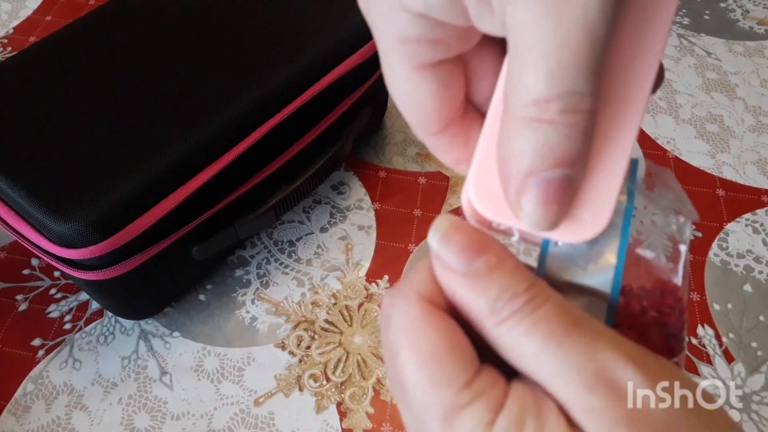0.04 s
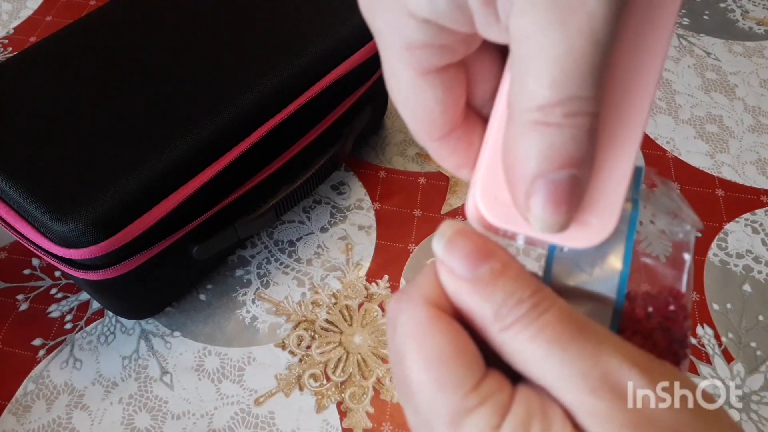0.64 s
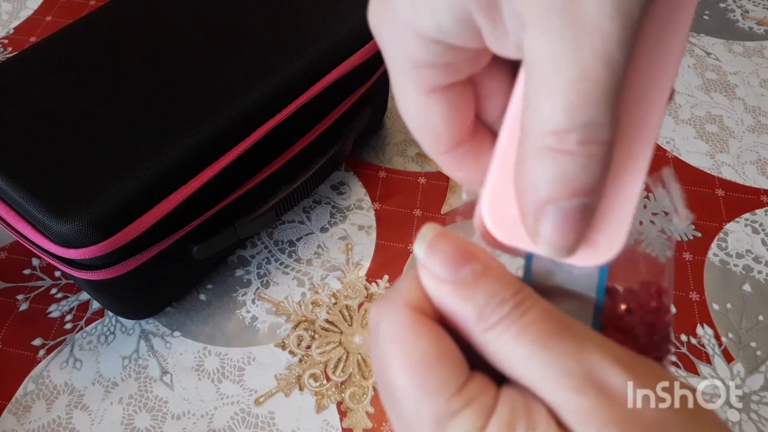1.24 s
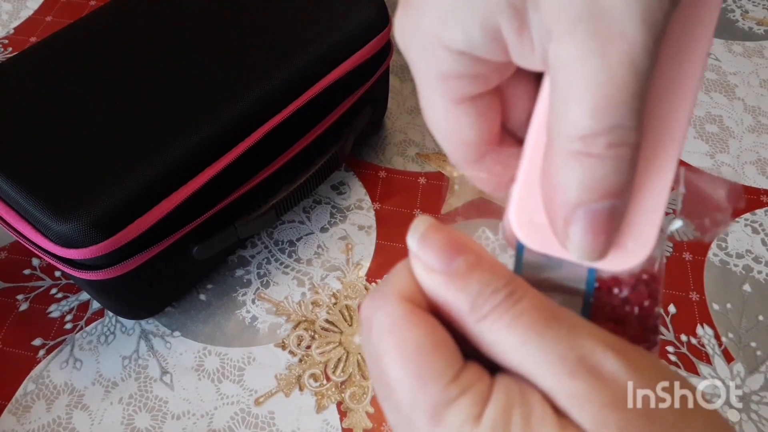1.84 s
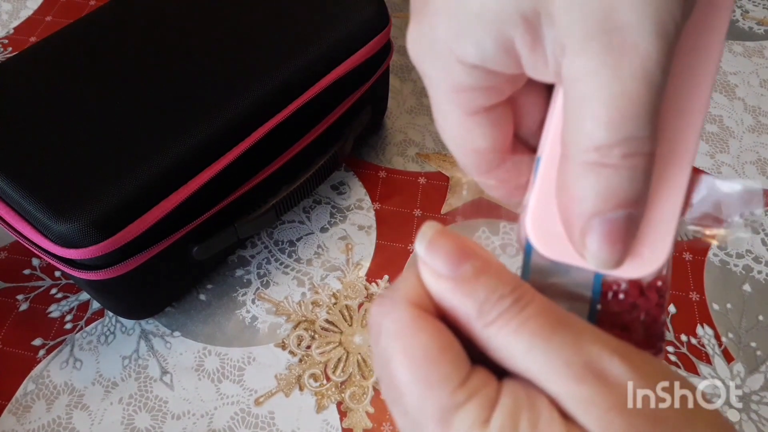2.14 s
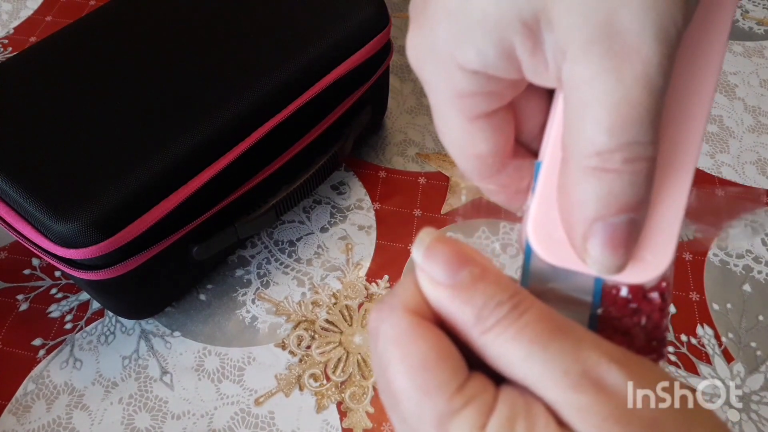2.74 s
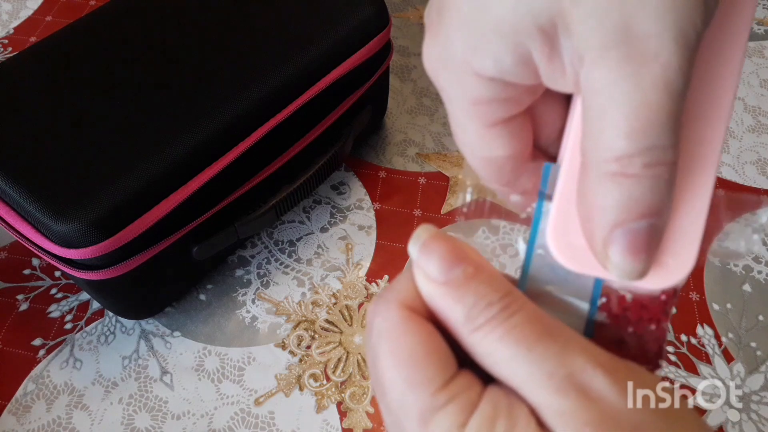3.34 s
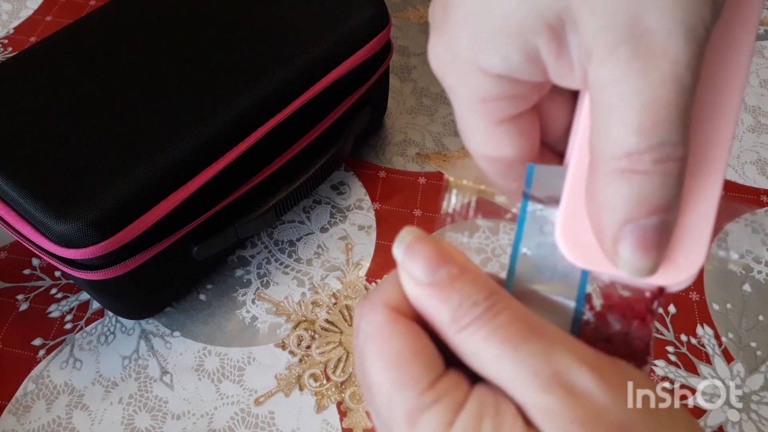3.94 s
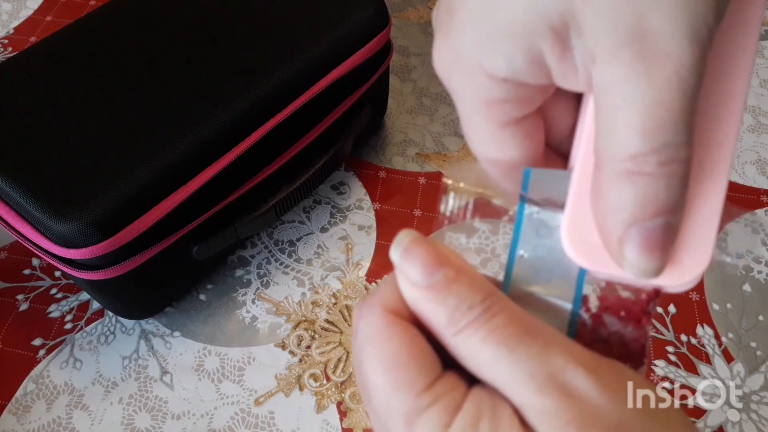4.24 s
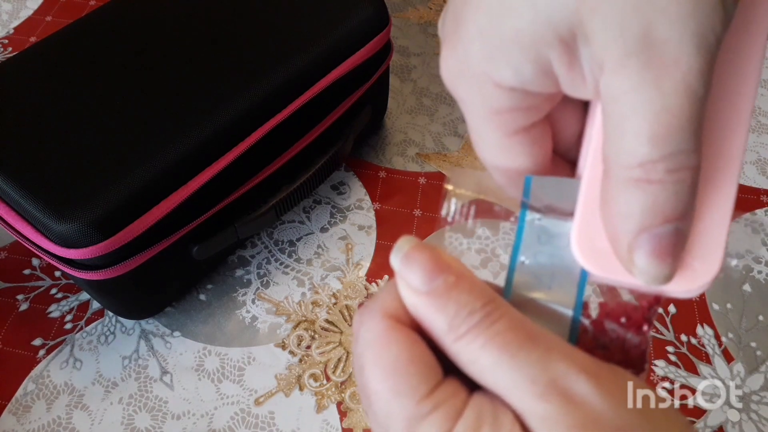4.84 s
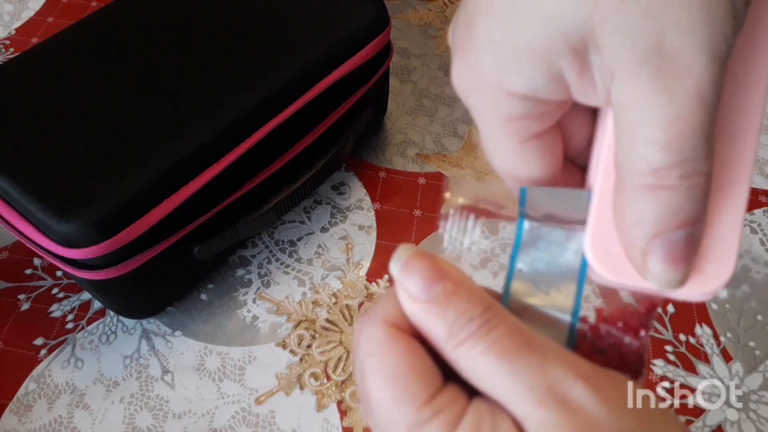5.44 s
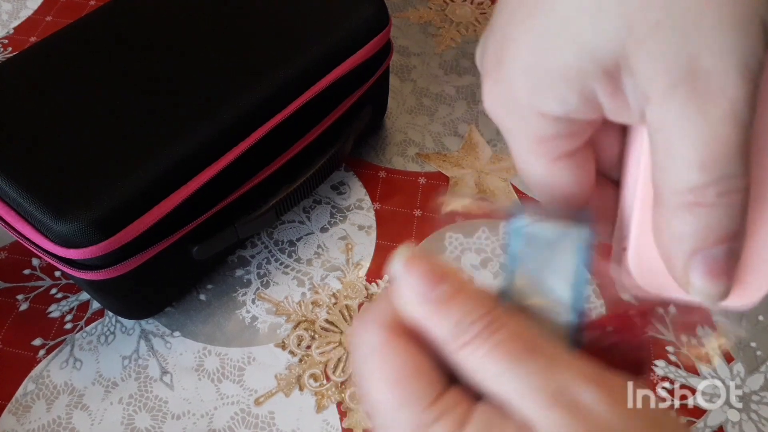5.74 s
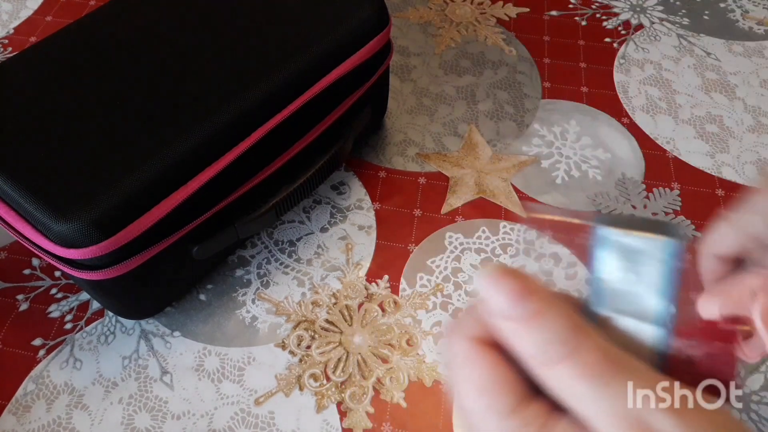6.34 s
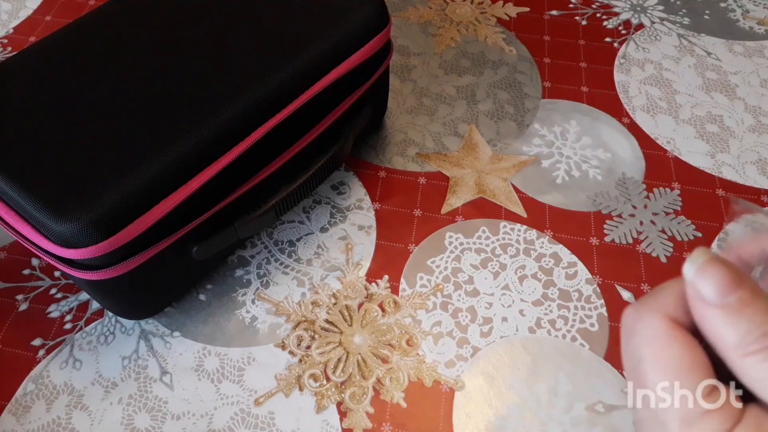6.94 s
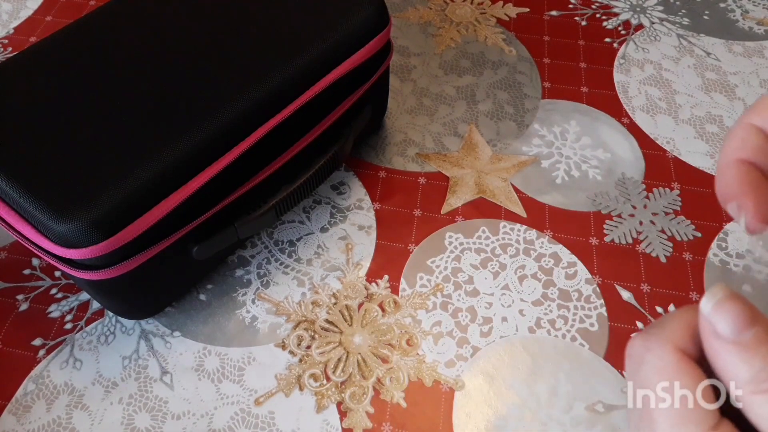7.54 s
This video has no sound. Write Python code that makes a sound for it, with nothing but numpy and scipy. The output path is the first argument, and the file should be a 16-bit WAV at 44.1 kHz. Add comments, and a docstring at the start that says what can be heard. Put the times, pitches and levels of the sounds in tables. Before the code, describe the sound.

Close by, a thin plastic bag crackles with sharp little snaps as a handheld heat sealer is drawn along its edge. The film rubs, sticks and slips through the jaws in quick runs of ticks. After a quieter stretch, the bag is pulled free with a loud crinkle, the hollow sealer knocks down on a table, and the bag crinkles once more. A small room echoes slightly over a faint hum.

```python
"""Sealing a plastic bag

A small handheld heat sealer is drawn along the edge of a thin plastic bag, close by. Creases snap,
the film sticks and slips between the jaws, and the bag is pulled free with a loud crinkle.
The hollow sealer then knocks down on the table. A small room echoes, over a faint hum."""
import sys
import numpy as np
from scipy import signal
from scipy.fft import rfft, irfft, next_fast_len
from scipy.io import wavfile

SR = 44100
rng = np.random.default_rng(int(sys.argv[2]) if len(sys.argv) > 2 else 0)


def output_pcm(signal):
    """Save a mono or channel-first signal as 16-bit PCM at the path in sys.argv[1].

    Samples are clipped to [-1, 1] before scaling.
    """
    pcm = np.clip(np.atleast_2d(signal).T, -1, 1) * 32767
    wavfile.write(sys.argv[1], SR, np.round(pcm).astype(np.int16))


N = 334719
TIME = np.arange(N) / SR
CLICK_SAMPLES = 2048
FREQS = np.fft.rfftfreq(CLICK_SAMPLES, 1 / SR)  # the frequencies a click is built from


def amp(db):
    """Turns decibels into a gain to multiply by."""
    return 10 ** (np.asarray(db) / 20)


def unit(x):
    """Scales a signal to an average (rms) level of one."""
    return x / np.sqrt(np.mean(x ** 2) + 1e-20)


def look_up(table, hz=FREQS):
    """Reads between the rows of a table, on a logarithmic frequency scale."""
    row_hz, value = np.transpose(table)
    return np.interp(np.log(hz + 1), np.log(row_hz + 1), value)


def noise(tone):
    """Steady noise of level one, shaped by a tone table."""
    size = next_fast_len(N)
    gain = amp(look_up(tone, np.fft.rfftfreq(size, 1 / SR)))
    return unit(irfft(rfft(rng.standard_normal(N), size) * gain, size)[:N])


def add(mix, start_s, sound):
    """Mixes a sound in at the given time."""
    part = mix[max(round(start_s * SR), 0):][:len(sound)]
    part += sound[:len(part)]


def resonance(hz, width_hz):
    """A peak of gain around one pitch: the narrower it is, the longer it rings."""
    return 1 / (1 + ((FREQS ** 2 - hz ** 2) / ((FREQS + 1) * width_hz)) ** 2)


def click(gain):
    """The sharpest click that starts at time zero and has this gain at each frequency."""
    log_gain = np.log(np.maximum(gain, 1e-5))
    mirrored = np.concatenate([log_gain, log_gain[-2:0:-1]])
    return np.fft.ifft(np.exp(np.conj(signal.hilbert(mirrored)))).real


def smear(pulse, lag_at_4khz_s=0.0003076):
    """High bending waves outrun low ones, so a click spreads out a little."""
    cycles = 2 * lag_at_4khz_s * np.sqrt(4000 * np.fft.rfftfreq(len(pulse), 1 / SR))
    return irfft(rfft(pulse) * np.exp(-2j * np.pi * cycles))


def drift(per_s):
    """A slow random curve that wanders around zero."""
    times = np.arange(0, TIME[-1] + 1, 1 / per_s)
    return np.interp(TIME, times, rng.standard_normal(len(times))) * np.sqrt(3 / 2)


# Tone of the quiet room (frequency [Hz], level [dB])
ROOM_NOISE_TONE = [(15, -65), (25, -30.5), (97, -11), (120, -15), (145, -6.5), (195, -14.5), (242, -6),
                   (309, -13), (335, -18.5), (384, -17), (416, -19), (451, -11.5), (531, -27),
                   (2840, -34.5), (16000, -38.5)]
# Notes in the electrical hum (frequency [Hz], level [dB])
HUM_NOTES = [(100, -89.5), (150.2, -79), (250.3, -76.5), (300, -81.5), (450.5, -79)]
def background(noise_db=-71):
    """Low room noise and a mains hum that wavers slightly."""
    out = amp(noise_db) * noise(ROOM_NOISE_TONE)
    for hz, db in HUM_NOTES:
        waver = 1 + 0.12 * drift(4)
        out += amp(db) * unit(waver * np.sin(2 * np.pi * hz * TIME + 0.15 * drift(3)))
    return out


def effort(moves):
    """Level in dB of hand movements over time: each swells to a peak and dies away."""
    power = np.zeros(N)
    for peak_s, db, rise_s, fall_s in moves:
        away = np.maximum((peak_s - TIME) / rise_s, (TIME - peak_s) / fall_s)
        power += amp(db - 20 * np.minimum(away, 10)) ** 2
    return 10 * np.log10(power)


def tiny_clicks(level_db, gain, per_s, spread_db, width_hz=3500, flat_gain=0.34, pitches=5):
    """Countless tiny clicks of random size blend together and follow a level curve."""
    out = np.zeros(N)
    for hz in np.linspace(1500, 8000, pitches):
        sizes = amp(spread_db * np.minimum(rng.exponential(1, N), 4))
        chance = rng.uniform(-1, 1, N)  # a crease may flip either way
        spikes = sizes * np.sign(chance) * (abs(chance) < per_s / pitches / SR)
        tick = smear(click(gain * (resonance(hz, width_hz) + flat_gain)))
        out += signal.oaconvolve(spikes, tick)[:N]
    return amp(level_db) * unit(out)


# Hands bending the loose film (peak time [s], level [dB], 20 dB rise [s], 20 dB fall [s])
BENDS = [(.01, -65, 0.1, 0.16), (.35, -72.5, 0.028, 0.067), (1.0, -64, 0.075, 0.14),
         (1.22, -52.5, 0.12, 0.11), (3.575, -70, 0.14, 0.09), (3.82, -73.5, 0.67, 0.9),
         (4.08, -79, 0.35, 0.18), (5.0, -68, 0.073, 0.5), (5.2, -66, .05, .12), (5.64, -39, 0.048, .05),
         (5.755, -44, 0.13, 0.2), (5.95, -52, 0.2, 0.16), (6.28, -58, .14, 0.16), (6.45, -65.5, 0.11, 0.33),
         (6.625, -55.5, 0.032, 0.083), (7.43, -60.5, 0.2, 0.28), (7.575, -43.5, 0.046, 0.051)]
# Tone of the soft rustle (frequency [Hz], level [dB])
RUSTLE_TONE = [(200, -33.5), (700, -18), (1600, -5.5), (2200, 2), (3800, 1), (6000, -0.5), (7500, -6.5),
               (9500, -22.5), (12000, -20.5), (16000, -23.5)]
# Tone of the brittle crack that starts a snap (frequency [Hz], level [dB])
CRACK_TONE = [(20, -43.5), (120, -9), (400, 2.5), (620, -5), (900, 1.5), (6500, -3.5), (9500, -7.5),
              (12000, -5.5), (16000, -7.5)]
def crinkle(hard_bend_db=-48, steepness=2.4, brittle_db=-56):
    """The loose film rustles softly; hard bending adds bright, brittle cracks."""
    bending_db = effort(BENDS)
    rustle = tiny_clicks(bending_db, amp(look_up(RUSTLE_TONE)), per_s=900, spread_db=2.5)
    cracking_db = brittle_db + steepness * (bending_db - hard_bend_db)
    brittle = amp(look_up(CRACK_TONE))
    cracks = tiny_clicks(cracking_db, brittle, per_s=1200, spread_db=10.5, flat_gain=4.9, pitches=1)
    return rustle + cracks


# Tone the film gives to every snap (frequency [Hz], level [dB])
FILM_TONE = [(100, -13), (300, -4.5), (800, -2.5), (6500, 0.5), (7800, -2.5), (9500, -21.5), (12000, -14.5),
             (16000, -15)]
def small_snaps(effort_db, per_s=55, level_db=-25, usual_effort_db=-60, ring_hz=4600, sheet_hz=1650):
    """Small creases give way at random moments, louder the harder the film is worked."""
    out = np.zeros(N)
    film, brittle = amp(look_up(FILM_TONE)), amp(look_up(CRACK_TONE))
    for k, (late, size, pitch, body) in enumerate(rng.standard_normal((800, 4))):
        start_s = (k + late / 2) / per_s
        if 0 < start_s < TIME[-1]:
            ring = resonance(ring_hz * 2 ** (0.34 * pitch), width_hz=2200)
            sheet = amp(-5 + 5 * body) * resonance(sheet_hz, sheet_hz / 2)
            gain = np.hypot(film * np.hypot(ring, sheet), brittle * amp(-24))
            db = level_db + 0.96 * (effort_db[int(start_s * SR)] - usual_effort_db) + 3 * size
            add(out, start_s, amp(db) * smear(click(gain)))
    return out


def flutter(pulse, strength=0.53, decay_s=0.0021, delay_s=0.0005):
    """Ripples cross the sheet and come back for a few milliseconds after a snap."""
    t = TIME[:512]
    waves = rng.standard_normal(len(t)) * np.exp(-t / decay_s) * (t > delay_s)
    waves *= strength / np.linalg.norm(waves)
    waves[0] = 1  # the snap itself
    return signal.fftconvolve(pulse, waves / np.sqrt(1 + strength ** 2))


# The sheet rings lower as film comes free of the jaws, higher when held tight (time [s], pitch [Hz])
SHEET_PITCH = [(1, 1730), (3.3, 1650), (3.8, 1124), (5.15, 1036), (5.6, 1426), (5.71, 910), (5.8, 1882),
               (7.35, 2000), (7.56, 1040)]
# Loud creases snapping (time [s], level [dB], ring pitch [Hz], ring width [Hz],
# sheet compared with ring [dB], base crack compared with ring [dB], relative room echo [dB])
CREASE_SNAPS = [(0.055, -19, 3860, 2400, -30, -29, -9.5), (.254, -38, 3480, 4000, -5, -28, -7),
                (0.9885, -23.5, 4140, 1186, 6.5, -24, 4), (1.0454, -1.5, 3940, 4560, -4.5, -20, -13.5),
                (1.097, -7, 4100, 3500, 4, -22, -13.5), (1.1697, 1, 3780, 2090, -13, -19, -6),
                (1.1724, -1.5, 5360, 6900, -2, -26, -11), (1.2069, 3, 3450, 4100, -3, -49, -17.5),
                (1.2151, -2.5, 4170, 3640, -2, -11, -17), (1.2893, 5.5, 4720, 3480, -17, -48, -15.5),
                (1.3302, -12.5, 4220, 2200, -7, -24, -16), (1.4134, -3.5, 3930, 3000, -23, -48, -11.5),
                (1.4415, -7.5, 4230, 1500, -8.5, -35, -17), (1.5292, 2.5, 3800, 2550, -8.5, -46, -14.5),
                (1.5938, -29.5, 3670, 1200, 18.5, -21, -11), (1.6119, 1, 4370, 3300, -5, -25, -8.5),
                (1.7558, -1.5, 3980, 4900, -1.5, -30, -10), (1.797, -15, 5530, 7000, -4, -21, -5),
                (1.8008, -7, 5830, 7000, -3.5, -25, -11), (1.8223, -5, 4830, 3900, -4, -14, -23),
                (1.8364, -3, 5800, 6200, -10.5, -27, -13), (1.9002, -19.5, 4330, 2800, -6, -33, -25),
                (2.008, -19.5, 4730, 2900, -19, -19.5, -8), (2.0327, -6, 5470, 5000, -35, -35, -9),
                (2.2084, -18.5, 7080, 7000, -15, -22, -5), (2.2195, -7.5, 5540, 7050, -16, -38, -10),
                (2.2251, -5.5, 5200, 2400, -7, -40, -14), (2.2911, -13, 4660, 3400, -10, -23, -14),
                (2.6214, 0.5, 5300, 4850, -10.5, -22.5, -12), (2.883, -6, 4990, 5610, -15.5, -19, -13),
                (2.9638, -12, 5010, 3590, -11, -30, -10.5), (3.0124, -4.5, 4110, 1384, -21, -35.5, -15),
                (3.0178, -16, 4960, 2600, -15, -20.5, -9), (3.03, -13, 5190, 2200, -7, -35.5, -13.5),
                (3.1312, 10, 4030, 1380, -4.5, -48.5, -16.5), (3.2232, -14.5, 2950, 3000, 2.5, -39, -8),
                (3.2626, 12.5, 4410, 1900, -9.5, -30, -16), (3.541, -28, 5000, 6240, 5.5, -37.5, -4),
                (3.577, -19.5, 7000, 6000, -12, -15, -11), (3.785, -7.5, 4450, 7050, 1, -31, -9.5),
                (3.876, 4.5, 3490, 2640, -9, -24, -12.5), (4.1102, -18, 2440, 1210, -4, -31, -6.5),
                (4.9887, -1.5, 3520, 2070, -2.5, -48, -15), (5.0326, -11, 3370, 2400, 1.5, -44.5, -7),
                (5.086, -6, 3820, 3800, -1.5, -29, -13), (5.095, -17, 4410, 4030, 3, -20, -13),
                (5.1672, 7, 5090, 2000, -20.5, -19.5, -13), (5.2814, -20.5, 4170, 2860, -31, -14, -12),
                (5.602, -6, 4310, 7040, 8.5, -9.5, -7.5), (5.6218, -4, 7450, 1310, -31.5, -5.5, -10),
                (5.6349, 6.5, 4400, 2830, -9.5, -13.5, -17.5), (5.6411, 2.5, 5640, 7000, -11.5, -10.5, -14),
                (5.691, -3.5, 3200, 1230, 1, -7, -13), (5.696, 0.5, 5900, 5800, -19, -23.5, -14),
                (5.7198, 4.5, 3750, 5770, 1.5, -15, -19), (5.7255, 12.5, 3530, 3900, -12, -17.5, -15.5),
                (5.734, 3, 4840, 1225, -29, -15.5, -3), (5.7462, 1, 4294, 1690, -9, -21.5, -16.5),
                (5.7539, -3.5, 5520, 3050, -8.5, -2, -13.5), (5.7865, -4.5, 3300, 2705, -3.5, -7, -13.5),
                (5.7912, 6, 6400, 7010, 7, -8.5, -15.5), (5.8911, 6, 5700, 6970, -4.5, -45, -15.5),
                (5.897, 12, 4610, 3610, -17, -15, -16.5), (5.947, -12.5, 5130, 4300, -2, -13, -16),
                (6.0024, -5, 3880, 1250, -26, -22, -18), (6.168, -26, 4470, 5900, 4.5, -16, -1.5),
                (6.2309, -15.5, 3560, 2960, -29, -30, 0.5), (6.3632, -9.5, 3880, 2960, 0, -18.5, -1.5),
                (6.388, 11, 4560, 2090, -33, -22, -13.5), (6.6313, -8.5, 5500, 1714, -9.5, -23, -9),
                (7.3545, -4.5, 4500, 2600, -5, -27, -13), (7.439, -9.5, 2370, 4620, -21, -20, -11),
                (7.465, -15.5, 4200, 4750, -14, -12, -18), (7.5304, -13, 5300, 2800, -24, -25, -10),
                (7.535, -3, 4390, 5600, -30, -23, -9.5), (7.5565, -3, 7340, 1200, -30, -9, -12),
                (7.5597, 5.5, 3770, 5030, -21, -15, -18)]
def loud_snaps(echo_boost_db=0.2, widen=1.1):
    """Each crease cracks, ringing its own small patch and the wider sheet; gives (direct, to room)."""
    near, to_room = np.zeros(N), np.zeros(N)
    film, brittle = amp(look_up(FILM_TONE)), amp(look_up(CRACK_TONE))
    for start_s, db, hz, width_hz, sheet_db, crack_db, room_db in CREASE_SNAPS:
        sheet_hz = np.interp(start_s, *np.transpose(SHEET_PITCH))
        sheet = film * amp(sheet_db) * resonance(sheet_hz, 0.62 * sheet_hz)
        crack = brittle * amp(crack_db + 0.13 * db)  # harder snaps are brighter
        shared_power = sheet ** 2 + crack ** 2
        direct = click(np.sqrt((film * resonance(hz, width_hz)) ** 2 + shared_power))
        # the room hears the ring from all sides of the crease
        all_round = click(np.sqrt((film * resonance(hz, width_hz * widen)) ** 2 / widen + shared_power))
        add(near, start_s, amp(db) * flutter(smear(direct)))
        add(to_room, start_s, amp(db + room_db + echo_boost_db) * all_round)
    return near, to_room


# Tight patches of film popping through (time [s], peak level [dB], pitch [Hz], rise time [s])
FILM_POPS = [(1.0041, -30, 1596, 0.0009), (3.1228, -41.5, 1445, 0.00074), (5.8343, -28.5, 1570, 0.0012)]
def pops(roughness=0.19):
    """A patch of film flips and swings unevenly for about ten cycles."""
    out, t = np.zeros(N), TIME[:CLICK_SAMPLES]
    for start_s, db, hz, rise_s in FILM_POPS:
        swell = t / rise_s * np.exp(1 - t / rise_s)
        buckling = unit(irfft(rfft(rng.standard_normal(len(t))) * resonance(hz, 2 * hz)))
        add(out, start_s, amp(db) * swell * (np.sin(2 * np.pi * hz * t) + roughness * buckling))
    return out


# Dull bumps of fingers and sealer (time [s], peak level [dB], pitch [Hz])
FINGER_BUMPS = [(1.207, -47, 460), (5.634, -41, 370), (5.645, -37, 330), (5.727, -49, 480),
                (5.754, -46.5, 420), (5.792, -41, 450), (5.897, -39, 380), (6.387, -50, 380),
                (6.638, -41.5, 160), (7.561, -37.5, 380)]
def bumps():
    """Fingers and the sealer's shell make low thuds that die almost at once."""
    out = np.zeros(N)
    for start_s, db, hz in FINGER_BUMPS:
        thud = click(resonance(hz, 0.92 * hz))
        add(out, start_s, amp(db) * thud / abs(thud).max())
    return out


# Ringing of the jaws and the film stretched between them (pitch [Hz], width [Hz], level [dB])
JAW_RINGS = [(1600, 260, 0), (2750, 380, 1), (3695, 320, 2), (4070, 240, -5), (4840, 220, -0.5),
             (5900, 730, -4), (6940, 610, -5), (13040, 2000, -17.5)]
def jaws():
    """How strongly the jaws ring at each frequency."""
    return np.sqrt(sum((amp(db) * resonance(hz, width_hz)) ** 2 for hz, width_hz, db in JAW_RINGS))


# Tugs of the sealer along the film (peak time [s], level [dB], 20 dB rise [s], 20 dB fall [s])
SEALER_TUGS = [(1.35, -74, 0.073, 0.14), (1.72, -58.5, 0.096, 0.2), (1.81, -49.5, 0.14, 0.044),
               (2.05, -70.5, 0.088, .2), (2.23, -52, 0.028, 0.052), (2.56, -74, 0.087, 0.086),
               (2.645, -56, 0.026, 0.065), (2.89, -50.5, .02, 0.1), (3.02, -58.5, 0.069, 0.19)]
def rubbing():
    """The film rubs through the jaws with each tug, and its fine friction makes them ring."""
    return tiny_clicks(effort(SEALER_TUGS), jaws(), per_s=950, spread_db=4.0)


# Runs of sticking and slipping (first slip [s], last slip [s], slips [count], relative level [dB],
# growth over the run [dB], ring pitch [Hz], relative crack level [dB])
SLIP_RUNS = [(2.0625, 2.1584, 11, -25.5, 8.5, 5360, -14), (2.4105, 2.538, 4, -28.5, 3.5, 5800, -37),
             (2.7343, 2.8735, 8, -26, -5.5, 5800, -31.5), (3.055, 3.0995, 5, -24, 5.5, 4750, -33),
             (4.934, 4.98, 4, -20.5, 9, 2550, -40)]
def slips(boost_db=5, sheet_hz=1100, jitter=0.05, scatter_db=2.2, pitch_scatter=0.03):
    """The jaws tick each time the film lets go, each tick from a slightly different length of film."""
    out, brittle = np.zeros(N), amp(look_up(CRACK_TONE))
    rings = jaws() + amp(-15) * resonance(4500, 4000) + amp(-3) * resonance(7800, 1100)
    rings *= amp(look_up(FILM_TONE))
    sheet = amp(-17) * resonance(sheet_hz, sheet_hz / 2)
    for first_s, last_s, count, db, growth_db, hz, crack_db in SLIP_RUNS:
        crack = brittle * amp(crack_db) * FREQS / FREQS[-1]  # so small a crack gives off only treble
        gain = rings * resonance(hz, 1.084 * hz) + sheet + crack
        for progress, (late, size, pitch) in zip(np.linspace(0, 1, count), rng.standard_normal((32, 3))):
            retuned = np.interp(FREQS * (1 + pitch_scatter * pitch), FREQS, gain)
            start_s = first_s + (last_s - first_s) * (progress + jitter * late / count)
            tick_db = db + boost_db + growth_db * (progress - 0.5) + scatter_db * size
            add(out, start_s, amp(tick_db) * smear(click(retuned)))
    return out


# Ringing of the sealer's hollow shell (pitch [Hz], width [Hz], relative level [dB])
SHELL_RINGS = [(795, 21, -4), (969, 60, -0.5), (1198, 28, -8), (1486, 49, -4), (2000, 27, -7),
               (2290, 43, -18), (2800, 15, -1), (3030, 140, -5), (3320, 85, -6), (3700, 180, -1)]
# Tone of the shell hitting the table (frequency [Hz], relative level [dB])
KNOCK_TONE = [(30, -56), (70, -16), (155, 2), (230, -2.5), (310, -3.5), (500, -6.5), (700, -10.5),
              (1000, -4.5), (1600, -1.5), (2400, -6.5), (3400, -5.5), (4400, -11.5), (6800, -6),
              (9200, -35), (16000, -35)]
# The sealer landing (time [s], level [dB])
LANDINGS = [(6.699, 6)]
def set_down(room_db=-1, rattle_db=-8, rattle_s=0.0036, rings_db=-3, body_db=-1):
    """The sealer lands and rattles, far enough off to fill the room; gives (direct, to room)."""
    near, to_room = np.zeros(N), np.zeros(N)
    rings = sum(amp(db + rings_db) * resonance(hz, width_hz) for hz, width_hz, db in SHELL_RINGS)
    knock = click(amp(look_up(KNOCK_TONE) + body_db) + rings)
    rattle = rng.standard_normal(CLICK_SAMPLES) * np.exp(-TIME[:CLICK_SAMPLES] / rattle_s)
    rattle *= amp(rattle_db) / np.linalg.norm(rattle)
    for start_s, db in LANDINGS:
        add(near, start_s, amp(db) * smear(knock))
        add(near, start_s, amp(db) * signal.fftconvolve(knock, rattle))
        add(to_room, start_s, amp(db + room_db) * knock)
    return near, to_room


# Quick echoes off the hands, table and case (delay [s], gain [ratio])
NEAR_ECHOES = [(.0048, 0.03), (.0075, -0.021), (.0092, .05)]
def with_near_echoes(sound):
    """The direct sound plus its first bounces off things close by."""
    out = sound.copy()
    for delay_s, gain in NEAR_ECHOES:
        add(out, delay_s, gain * sound)
    return out


# How long the room rings (frequency [Hz], time to fade by 60 dB [s])
ROOM_FADE = [(120, 0.43), (400, 0.59), (1800, 0.4), (4500, 0.36), (8000, 0.29), (15000, 0.52)]
def room_echo(sound, delay_s=0.0046):
    """Many bounces blur into one tail, in which each frequency fades at its own speed."""
    bounces = rng.standard_normal(SR) * (TIME[:SR] > delay_s)
    hz, t, bands = signal.stft(bounces, SR, nperseg=256)
    fade = amp(-60 * t / look_up(ROOM_FADE, hz)[:, None])
    tail = signal.istft(bands * fade, SR, nperseg=256)[1]
    return signal.fftconvolve(sound, tail / np.linalg.norm(tail))[:N]


# Tone of the faint noise that sets left apart from right (frequency [Hz], level [dB])
STEREO_NOISE_TONE = [(20, -7.5), (60, -12), (150, -5), (400, -4.5), (1000, -10.5), (4000, -11),
                     (16000, -21.5)]
def stereo_width(to_room, noise_db=-91, echo_db=-25):
    """A little noise and room echo, to add on one side and subtract on the other."""
    return amp(noise_db) * noise(STEREO_NOISE_TONE) + amp(echo_db) * room_echo(to_room)


def scene(handling_room_db=-7, sliding_room_db=-6, pop_room_db=-17, tug_creases_db=3):
    """Mixes all the sounds in the room, nearly alike on the left and right."""
    crackle, crackle_to_room = loud_snaps()
    knock, knock_to_room = set_down()
    creasing_db = np.maximum(effort(BENDS), effort(SEALER_TUGS) + tug_creases_db)
    handling = bumps() + crinkle() + small_snaps(creasing_db)
    sliding = slips() + rubbing()
    popping = pops()
    to_room = crackle_to_room + knock_to_room + amp(handling_room_db) * handling
    to_room += amp(sliding_room_db) * sliding + amp(pop_room_db) * popping
    near = with_near_echoes(crackle + handling + sliding + popping + knock)
    middle = near + room_echo(to_room) + background()
    side = stereo_width(to_room)
    return np.array([middle + side, middle - side])


def record(dry):
    """Cuts away the very highest treble, above 16100 Hz."""
    low_pass = signal.firwin(255, 16100, window=("kaiser", 8), fs=SR)
    return signal.oaconvolve(dry, low_pass[None], "same", axes=1)


dry = scene()
out = record(dry)
output_pcm(out)
```